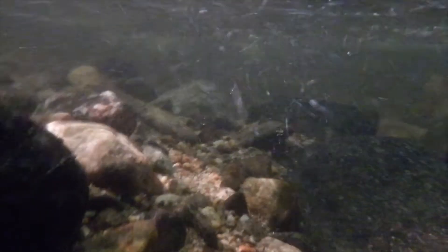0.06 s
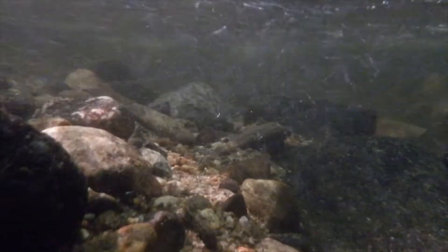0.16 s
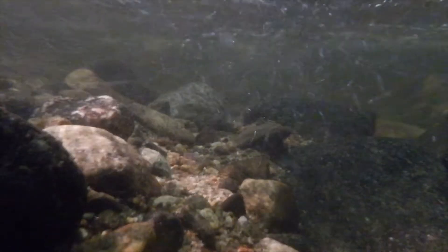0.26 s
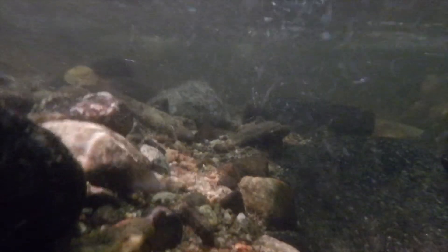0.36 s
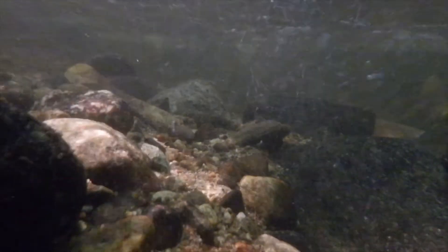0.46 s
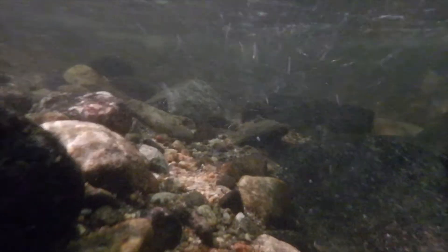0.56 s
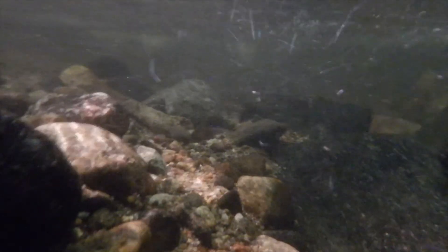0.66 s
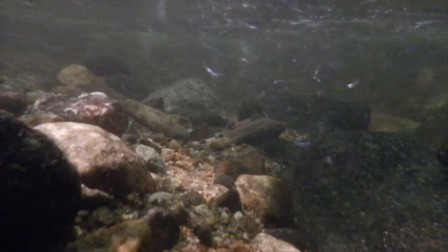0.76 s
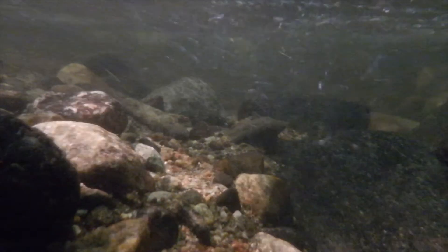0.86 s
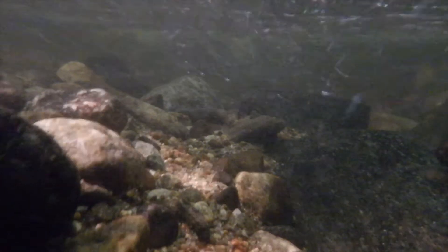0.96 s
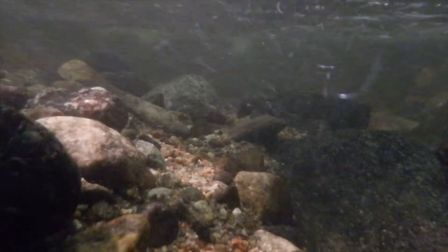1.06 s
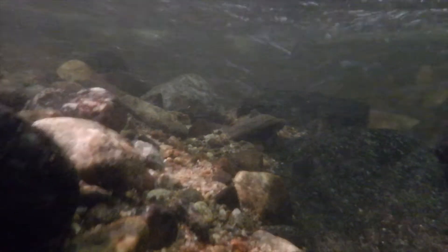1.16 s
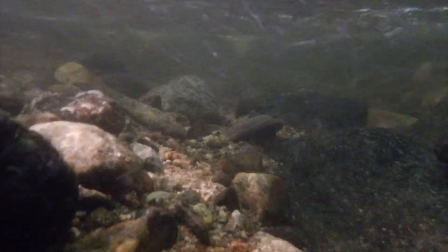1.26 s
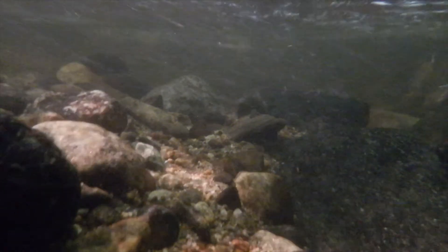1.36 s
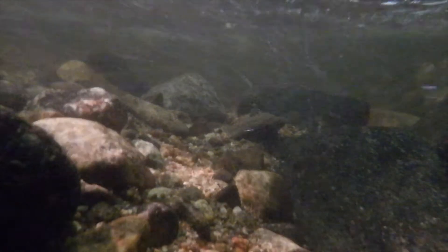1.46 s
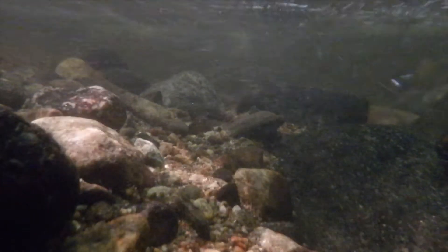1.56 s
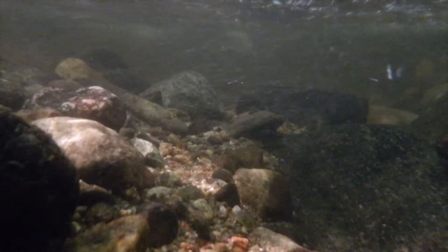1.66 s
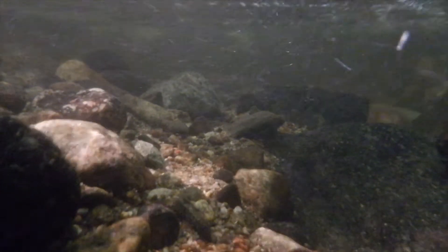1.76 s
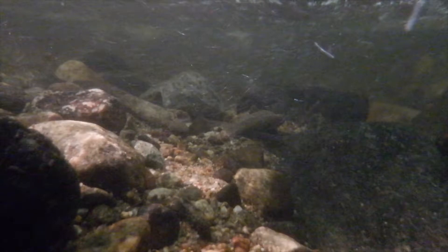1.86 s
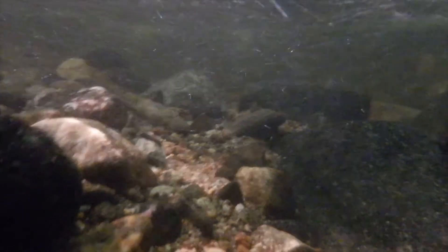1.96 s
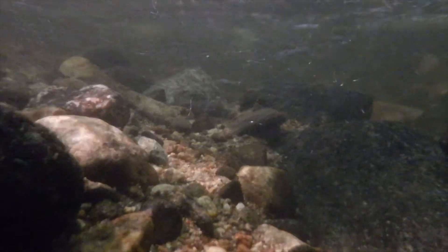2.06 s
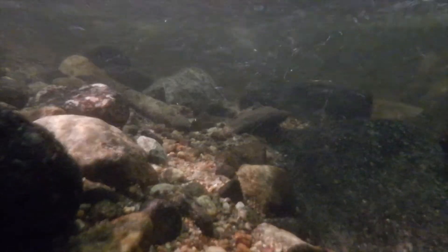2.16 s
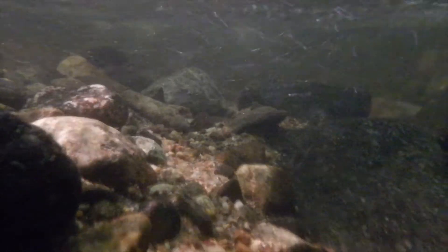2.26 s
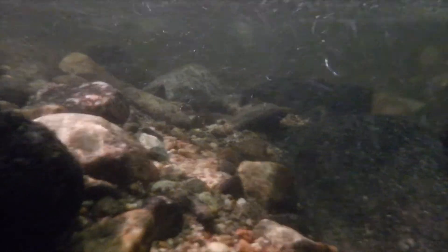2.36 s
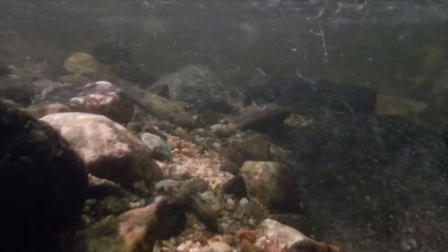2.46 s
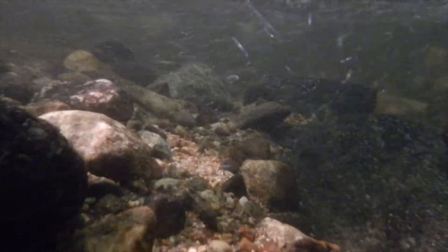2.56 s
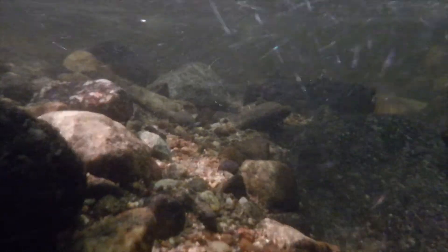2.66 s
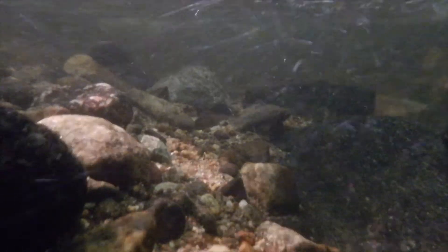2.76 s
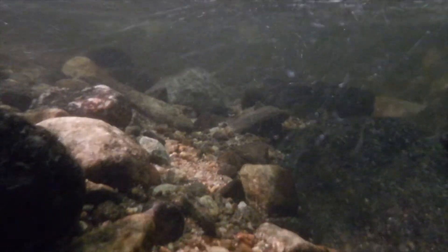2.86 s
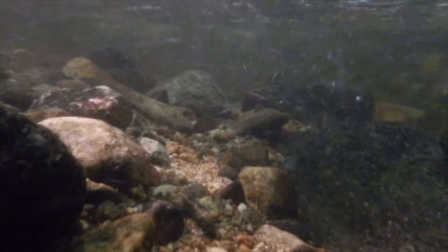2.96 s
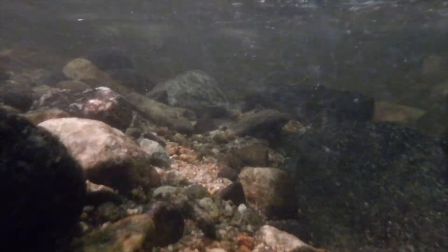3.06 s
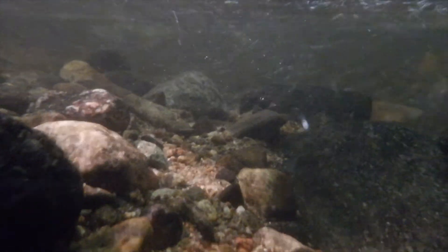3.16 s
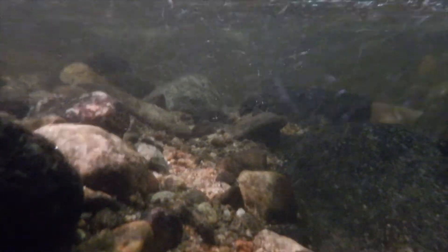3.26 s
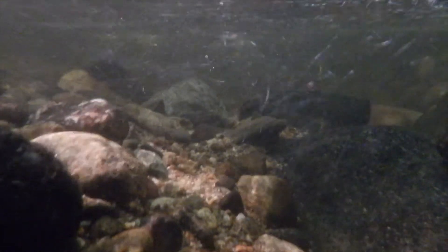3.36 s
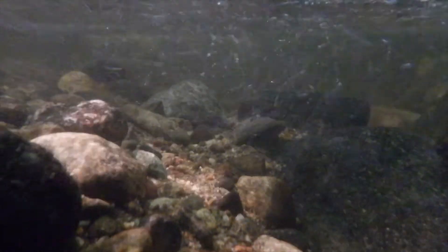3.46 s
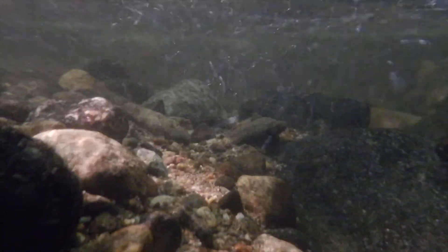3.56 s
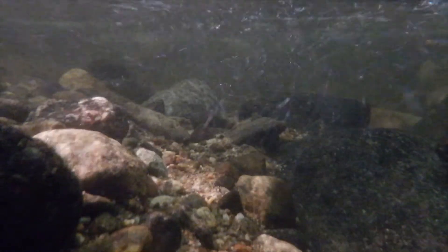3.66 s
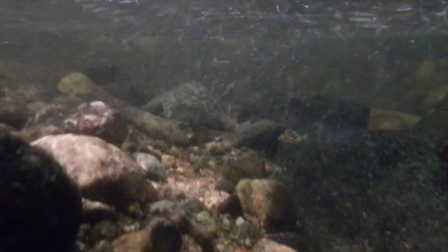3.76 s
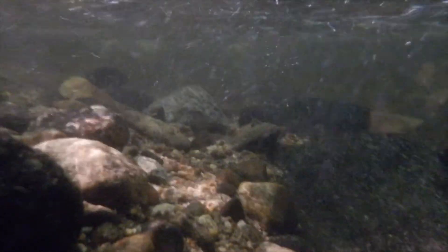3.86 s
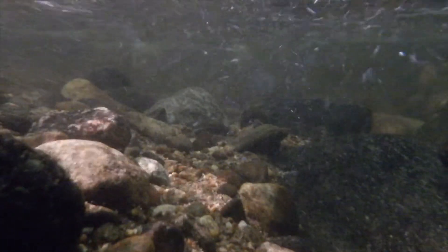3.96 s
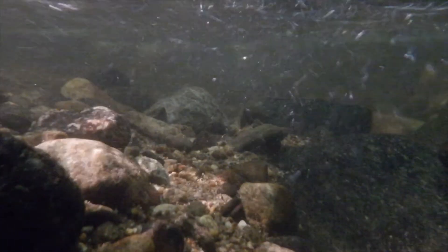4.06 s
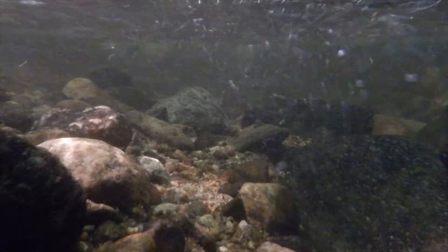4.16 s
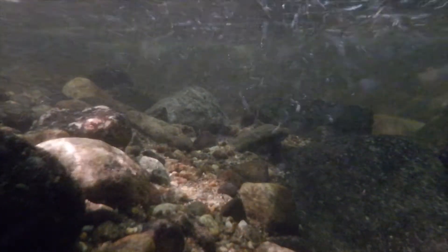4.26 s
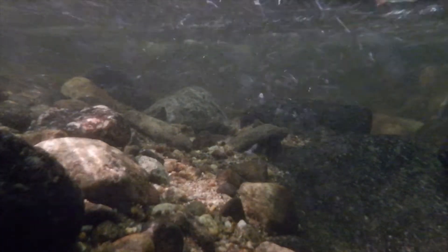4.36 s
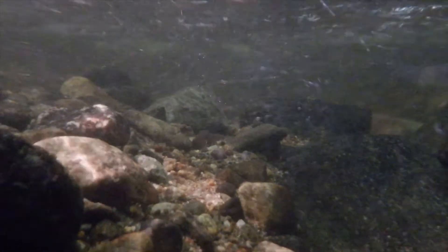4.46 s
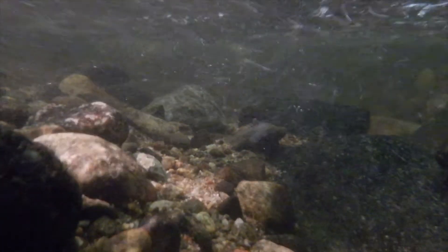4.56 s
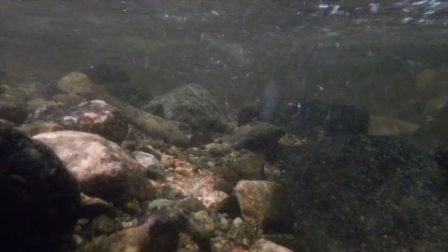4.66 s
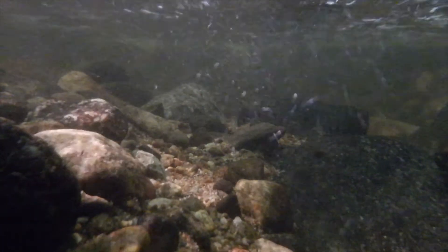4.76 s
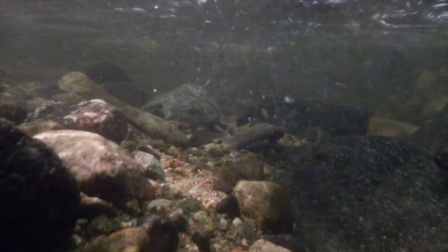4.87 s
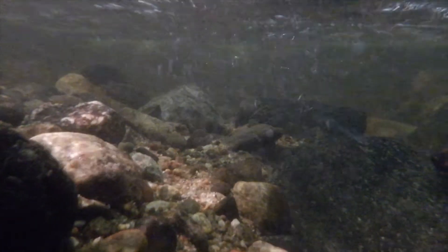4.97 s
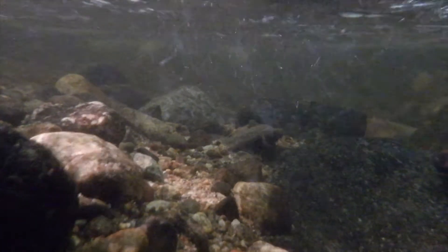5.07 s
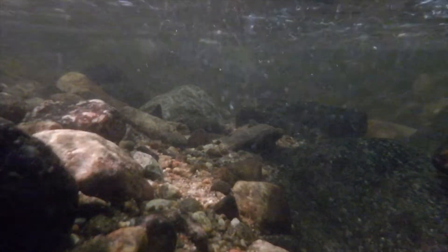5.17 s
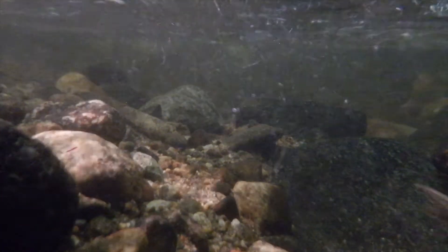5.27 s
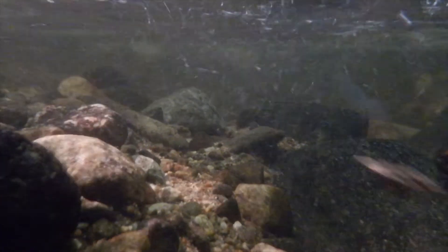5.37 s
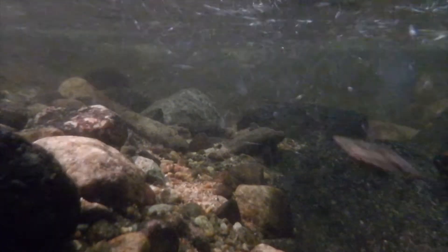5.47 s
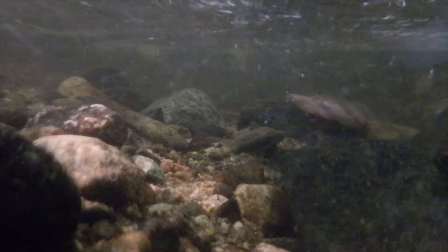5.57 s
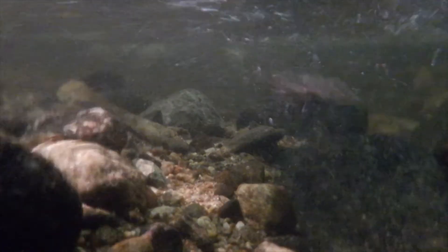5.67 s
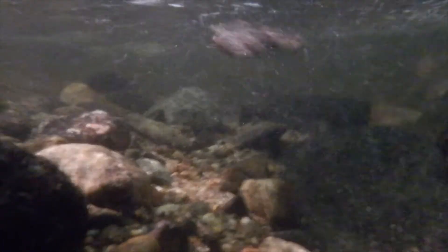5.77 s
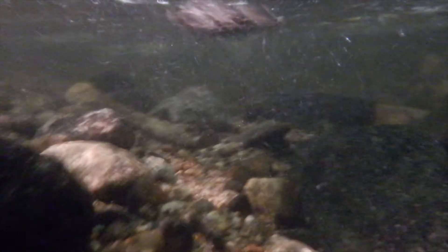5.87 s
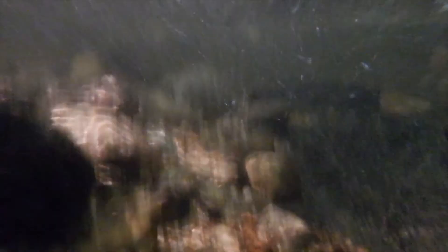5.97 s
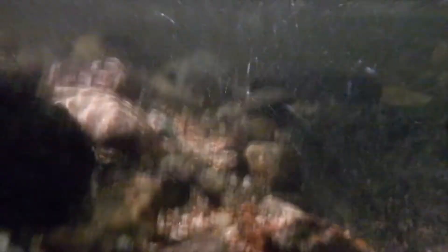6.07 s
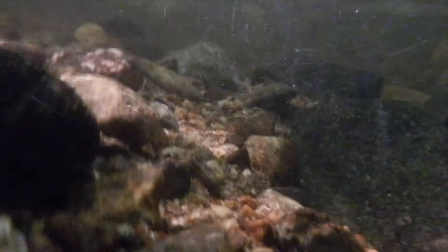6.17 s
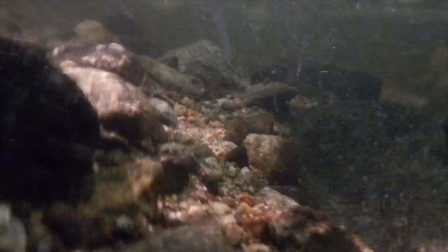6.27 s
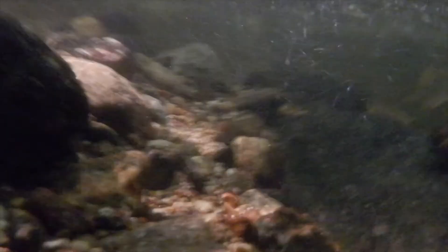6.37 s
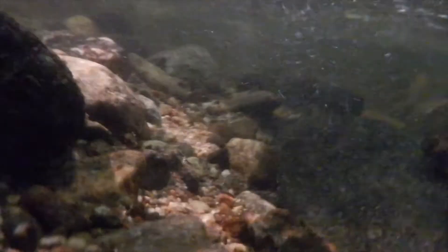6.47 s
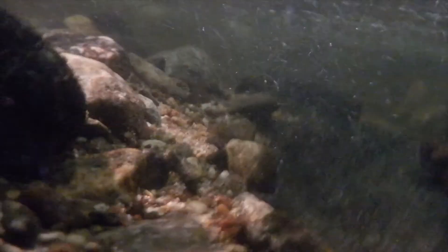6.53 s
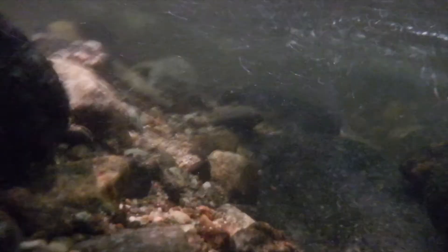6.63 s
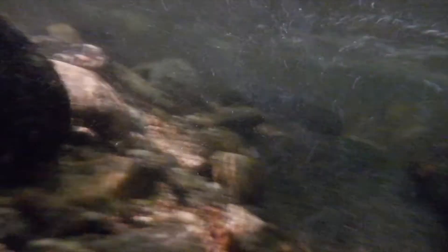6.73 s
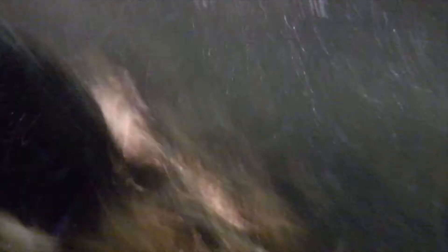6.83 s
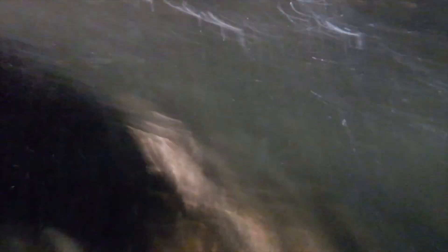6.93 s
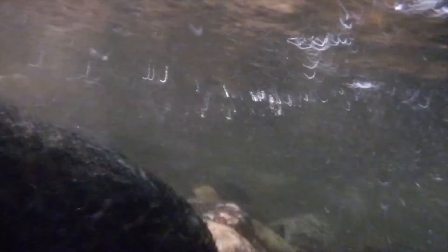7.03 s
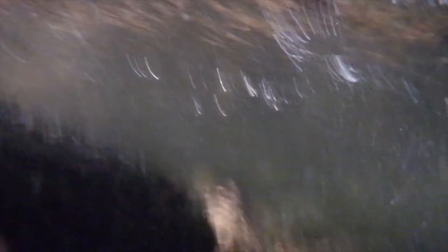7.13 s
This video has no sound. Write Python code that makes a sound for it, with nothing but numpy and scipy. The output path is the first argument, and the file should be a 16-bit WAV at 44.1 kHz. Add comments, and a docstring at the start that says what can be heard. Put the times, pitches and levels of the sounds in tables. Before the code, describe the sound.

Low rumbling current and dull gurgles surround a microphone in a sealed housing on a stony stream bed. The housing is bumped lightly at first, then several times harder, each blow giving a short, hollow boom. The water drops back and gradually returns. Toward the end, loud knocks and gritty clicks come in quick clusters, stirring up the water and pushing the stream sound down between them.

```python
"""The bed of a shallow stream, heard from a camera in a sealed case. Eddies press on the case and air pockets
gurgle, heavily muffled; a few tiny bubbles ping. The camera faintly whines, ticks and hisses. The case is
bumped and each blow sets it booming; there are sharp clicks on the case, a few of them only faint ticks. Loud
knocks make the gain control duck the stream, which then swells back."""
import sys
import numpy as np
from scipy import signal
from scipy.fft import rfft, irfft
from scipy.io import wavfile
from scipy.ndimage import uniform_filter1d, minimum_filter1d

SR = 44100
rng = np.random.default_rng(int(sys.argv[2]) if len(sys.argv) > 2 else 0)


def persist_wave(psi):
    """Save psi, clipped to +-1, as 16-bit WAV."""
    counts = np.round(np.clip(psi, -1, 1) * 32767).astype(np.int16)
    wavfile.write(sys.argv[1], SR, np.atleast_2d(counts).T)


N = 317520
TIME = np.arange(N) / SR


def from_db(db):
    """Decibels to gain."""
    return 10 ** (np.asarray(db) / 20)


def unit_rms(x):
    """Scale to rms 1."""
    return x / np.sqrt(np.mean(x ** 2) + 1e-30)


def gain_at(spectrum, hz):
    """Gain of a spectrum, interpolated over log frequency."""
    at_hz, db = np.transpose(spectrum)
    return from_db(np.interp(np.log(hz + 1e-9), np.log(at_hz), db))


def coloured(x, spectrum):
    """Filter by a spectrum; rms 1."""
    return unit_rms(irfft(rfft(x) * gain_at(spectrum, np.fft.rfftfreq(N, 1 / SR)), N))


def ring(drive, hz, t60_s):
    """One damped resonance."""
    radius, angle = from_db(-60 / (t60_s * SR)), 2 * np.pi * hz / SR
    return signal.lfilter([1, 0, -1], [1, -2 * radius * np.cos(angle), radius ** 2], drive + 1e-18)


def causal_pulse(gains):
    """Minimum-phase pulse with these spectral gains."""
    cepstrum = irfft(np.log(gains + 1e-9))
    half = len(cepstrum) // 2
    cepstrum[1:half] *= 2
    cepstrum[half + 1:] = 0
    return irfft(np.exp(rfft(cepstrum)))


def add(out, time_s, peak_db, sound):
    """Mix a sound in at a time and peak level."""
    start = round(time_s * SR)
    out[start:start + len(sound)] += (from_db(peak_db) * sound / np.abs(sound).max())[:N - start]


# current on the case: (time [s], eddies [dB], air pockets [dB])
CURRENT = [(0.0, 3, -15.5), (0.14, -1.5, 0), (0.27, -5, -4), (0.48, 1.5, 0), (0.85, 0, 0), (1.202, 3.5, 4),
           (1.598, -3, 4), (2.251, -1, 0), (2.58, -8, -8.5), (2.9, -0.5, -6), (3.5, 2, 0), (4.298, -1, 0),
           (5.152, 4, -2.5), (5.6, 0, 0.5), (6.05, -8, -8), (6.598, -8.5, -3), (7.2, -14.5, -4.5)]
# shifts of the case: (start [s], end [s], added flow [dB re current])
STIRS = [(2.3, 2.406, 15), (2.41, 2.477, 13), (5.67, 5.867, 15.5), (6.694, 6.94, 20), (7.0, 7.124, 22.5)]


def stream(fade_s=0.035):
    """The current drives the water sounds; shifting the case stirs them up."""
    times_s, *levels_db = np.transpose(CURRENT)
    flow, air = [from_db(np.interp(TIME, times_s, db)) for db in levels_db]
    stir = np.ones(N)
    for start_s, end_s, db in STIRS:
        inside_s = np.minimum(TIME - start_s, end_s - TIME)
        stir += from_db(db) * np.clip(inside_s / fade_s + .5, 0, 1)
    return eddies(flow * stir ** .7) + gurgle(air * stir) + splash(air ** .39 * stir)


# eddies through the case: (frequency [Hz], gain [dB])
EDDY_SPECTRUM = [(10, -17), (22, -2.5), (45, 1), (85, 2), (120, -7), (200, -39.5), (400, -84)]


def eddies(drive, level_db=-22):
    """Eddies press on the case: a low rumble."""
    return from_db(level_db) * drive * coloured(rng.standard_normal(N), EDDY_SPECTRUM)


def bubbles(per_s, low_hz, high_hz, t60_cycles, spread_db, pitches=20):
    """Air pockets of random size pinch off and ring down."""
    strengths = from_db(spread_db * np.minimum(rng.exponential(1, N), 3)) * rng.choice([-1, 1], N)
    births = strengths * (rng.random(N) < per_s / SR)
    pitch_index = rng.integers(0, pitches, N)
    return sum(ring(births * (pitch_index == k), hz, t60_cycles / hz) * hz
               for k, hz in enumerate(np.geomspace(low_hz, high_hz, pitches)))


# big air pockets through the case: (frequency [Hz], gain [dB])
GURGLE_SPECTRUM = [(60, -20.5), (110, -4), (160, 5), (200, -3.5), (256, -13), (340, -31), (400, -32),
                   (550, -46.5), (1000, -64)]


def gurgle(drive, level_db=-25):
    """Big air pockets ring low."""
    pockets = bubbles(per_s=380, low_hz=90, high_hz=450, t60_cycles=15, spread_db=3.5)
    return from_db(level_db) * drive * coloured(pockets, GURGLE_SPECTRUM)


# small air pockets through the case: (frequency [Hz], gain [dB])
SPLASH_SPECTRUM = [(200, -13), (450, 2), (720, 1), (1000, -6.5), (1250, -7.5), (1900, -19), (3000, -28.5),
                   (6000, -39.5)]


def splash(drive, level_db=-70):
    """Many small air pockets merge into a faint splashing."""
    pockets = bubbles(per_s=1500, low_hz=470, high_hz=3400, t60_cycles=32, spread_db=1.5)
    return from_db(level_db) * drive * coloured(pockets, SPLASH_SPECTRUM)


# lens motor hunting: (start [s], end [s])
LENS_RUNS = [(2.06, 2.34), (3.35, 4.77)]


def camera_whine(lens_hz=9378, lens_db=-86, idle=0.33, hunts_per_s=3.5,
                 electronics_hz=15704, electronics_db=-87, waver=0.41):
    """Lens motor and electronics each give a wavering tone; the motor's pulses as it hunts."""
    effort = np.full(N, idle)
    for start_s, end_s in LENS_RUNS:
        running = (TIME > start_s) & (TIME < end_s)
        effort += running * np.sin(np.pi * hunts_per_s * (TIME - start_s)) ** 2
    wavering = 1 + waver * unit_rms(uniform_filter1d(rng.standard_normal(N), size=800))
    lens = from_db(lens_db) * effort * np.sin(2 * np.pi * lens_hz * TIME)
    electronics = from_db(electronics_db) * np.sin(2 * np.pi * electronics_hz * TIME)
    return wavering * (lens + electronics)


# microphone noise: (frequency [Hz], gain [dB])
HISS_SPECTRUM = [(200, -5.5), (2500, -0.5), (3800, -3), (5500, 1.5), (12000, 3), (15200, -1), (15700, 2),
                 (16200, -3)]


def microphone_hiss(level_db=-80.5):
    """Steady self-noise of the microphone."""
    return from_db(level_db) * coloured(rng.standard_normal(N), HISS_SPECTRUM)


def ticking(per_s=6.7, tick_hz=12066, drive_db=-80, t60_s=.025, spread_db=3):
    """The camera's mechanism ticks evenly, very high and faint."""
    beats = np.diff(np.floor(TIME * per_s), prepend=0)
    strengths = from_db(drive_db + spread_db * rng.standard_normal(N))
    return ring(beats * strengths, tick_hz, t60_s)


# blows on the case: (time [s], peak [dB], boom [Hz], t60 [s])
KNOCKS = [(0.628, 1, 55.4, 0.042), (1.509, -9, 150, 0.11), (1.761, -6.5, 38, 0.091),
          (1.793, -4.5, 160.5, .11), (2.302, 9.5, 108.4, .1), (2.308, -4.5, 291, 0.039),
          (2.356, 16.5, 86.6, 0.15), (2.437, 15, 94.1, .085), (5.012, 6.5, 65.9, 0.02),
          (5.058, -4.5, 85, 0.11), (5.563, -8, 132.5, 0.16), (5.657, 13, 143.3, 0.2),
          (5.679, 11.5, 89, 0.029), (5.76, -1, 128, .08), (5.807, 10, 94, 0.0068),
          (5.819, 18, 127.3, 0.061), (5.865, 21.5, 328, 0.037), (5.869, 28, 103, 0.028),
          (5.883, 24.5, 141, 0.076), (5.983, -4.5, 130, .07), (6.4317, 24.5, 215, 0.0253),
          (6.44, 14.5, 142.7, 0.11), (6.507, -3, 151.4, 0.13), (6.658, 20.5, 158.5, 0.12),
          (6.843, 6.5, 150.6, 0.1), (6.989, 21, 159.5, 0.11), (7.015, 16, 169.2, 0.048),
          (7.031, 12, 148.6, 0.17), (7.061, 14, 112.7, 0.11), (7.088, 9, 162.1, .13)]


def knocks(width_at_100hz_ms=1.34, lead_s=.02):
    """A bell-shaped push sets the case booming; grip and support decide pitch and damping."""
    out = np.zeros(N)
    t_ms = 1000 * (TIME[:SR // 2] - lead_s)
    for time_s, peak_db, boom_hz, t60_s in KNOCKS:
        width_ms = width_at_100hz_ms * (100 / boom_hz) ** .65   # higher boom, shorter push
        push = np.exp(-(t_ms / width_ms) ** 2 / 2)
        add(out, time_s - lead_s, peak_db, -ring(push, boom_hz, t60_s))
    return out


# tiny bubbles near the case: (time [s], peak [dB], pitch [Hz])
PINGS = [(0.92, -58.5, 1330), (1.725, -65, 5180), (4.668, -67, 4870)]


def pings(t60_s=0.022):
    """A lone bubble rings briefly at one pitch."""
    out, t = np.zeros(N), TIME[:SR // 10]
    for time_s, peak_db, hz in PINGS:
        add(out, time_s, peak_db, np.sin(2 * np.pi * hz * t) * from_db(-60 * t / t60_s))
    return out


# click transmission of the case: (frequency [Hz], gain [dB])
CASE_RESPONSE = [(150, -14.5), (350, -0.5), (700, 0.5), (1450, -3), (2100, -5.5), (2850, -12),
                 (3700, -25.5), (4300, -50), (5100, -16), (6000, -20.5), (7400, -13), (9400, -19),
                 (12000, -24.5), (14300, -23), (16000, -23)]
# sharp clicks on the case, a few of them only faint ticks: (time [s], peak [dB], cutoff [Hz], repeat delay
# [ms])
CLICKS = [(2.103, -48, 1110, 0.36), (2.3054, -25.5, 1377, 0.43), (2.312, -32.5, 1220, 0.2),
          (2.365, -24, 1590, 0.35), (3.786, -51, 820, 0.22), (4.742, -47, 1806, 0.37),
          (4.861, -47.5, 1000, 0.45), (5.013, -36, 1390, 0.35), (5.6546, -3, 9000, 0.64),
          (5.6568, 8, 18000, 1.345), (5.6862, -20.5, 5000, 0.63), (5.759, -31, 1290, 0.4),
          (5.822, -10, 1414, 0.39), (5.867, -6, 1400, 0.52), (5.869, 0, 1200, .38), (6.4313, 14, 674, .575),
          (6.656, -17, 1100, .12), (6.988, 10.5, 560, .33), (6.992, 2.5, 552, 0.71), (7.017, 6.5, 610, .26),
          (7.032, 3.5, 611, 0.48), (7.063, -7, 550, 0.64)]


def clicks(rolloff_order=4.5, edge_db=-48, repeat_gain=.85, size=4096):
    """Clicks and faint ticks: a gritty double pulse through the case; dull ones keep a faint edge."""
    out, hz = np.zeros(N), np.fft.rfftfreq(size, 1 / SR)
    for time_s, peak_db, cutoff_hz, repeat_ms in CLICKS:
        lowpass = 1 / np.sqrt(1 + (hz / cutoff_hz) ** (2 * rolloff_order))
        pulse = causal_pulse(gain_at(CASE_RESPONSE, hz) * (lowpass + from_db(edge_db)))
        repeat = repeat_gain * np.exp(-2j * np.pi * hz * repeat_ms / 1000)   # hollows the click
        excitation = 1 + repeat + rfft(grit(size))
        add(out, time_s, peak_db, irfft(rfft(pulse) * excitation))
    return out


def grit(size, per_s=1500, grain_db=-33, t60_s=.12):
    """A brief sandy crunch trails each click."""
    grains = rng.standard_normal(size) * (rng.random(size) < per_s / SR)
    return from_db(grain_db) * grains * from_db(-60 * TIME[:size] / t60_s)


# shell resonances: (frequency [Hz], gain at resonance [dB], t60 [s])
SHELL_MODES = [(317, 7, 0.073), (556, -7.5, 0.041), (1130, 3, .012), (1881, 1, .04), (3970, 0.5, .045)]


def shell_ring(drive):
    """The shell rings on after each click."""
    return sum(from_db(db) * np.log(1000) / (t60_s * SR) * ring(drive, hz, t60_s)
               for hz, db, t60_s in SHELL_MODES)


def gain_control(x, ceiling_db=0.77, look_ahead_s=.004, hold_s=0.04, recover_db_per_s=17,
                 start_duck_db=17, step_db=0.034):
    """The gain starts low, drops just ahead of peaks over the ceiling, holds, then creeps back."""
    hold, ahead = int(hold_s * SR), int(look_ahead_s * SR)
    over_db = np.maximum(20 * np.log10(np.abs(x) + 1e-9) - ceiling_db, 0)
    held_db = -minimum_filter1d(-over_db, size=hold, origin=(hold - 1) // 2)
    early_db = np.pad(held_db[ahead:], (0, ahead), mode="edge")
    recovery_db = recover_db_per_s * TIME
    duck_db = np.maximum(np.maximum.accumulate(early_db + recovery_db), start_duck_db) - recovery_db
    smooth_db = uniform_filter1d(uniform_filter1d(duck_db, size=ahead), size=ahead)
    return from_db(-np.round(smooth_db / step_db) * step_db)   # steps crackle faintly in a quick fall


def scene():
    """Water, blows and the camera's own noises at one microphone inside the case."""
    water = stream()
    clicking = clicks()
    camera = camera_whine() + microphone_hiss() + ticking()
    return (water + camera + knocks() + pings() + clicking + shell_ring(clicking))[None]


def record(dry, noise_db=-93, limit_db=1.6, hardness=6.0, cutoff_hz=16300):
    """Gain control, noise floor, soft then hard clipping, steep low-pass."""
    ducked = dry * gain_control(dry[0]) + from_db(noise_db) * rng.standard_normal(N)
    rounded = ducked / (1 + np.abs(ducked / from_db(limit_db)) ** hardness) ** (1 / hardness)
    lowpass = signal.ellip(10, .1, 80, cutoff_hz, fs=SR, output="sos")
    return signal.sosfilt(lowpass, np.clip(rounded, -1, 1))


dry = scene()
out = record(dry)
persist_wave(out)
```